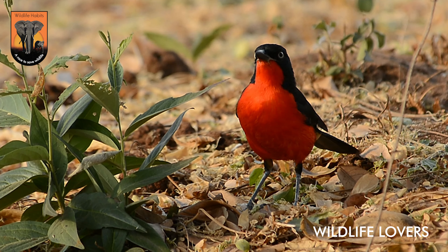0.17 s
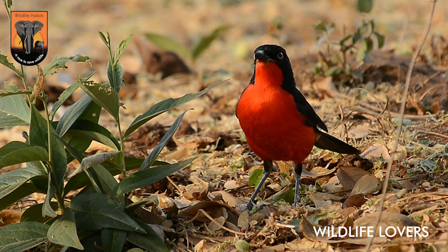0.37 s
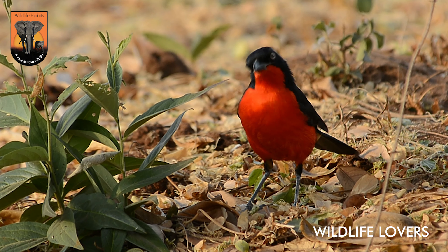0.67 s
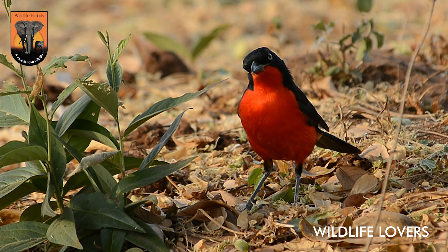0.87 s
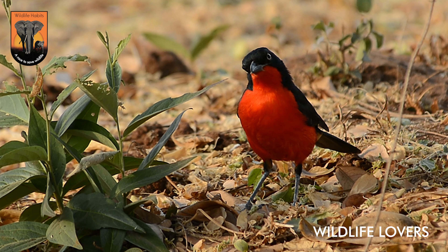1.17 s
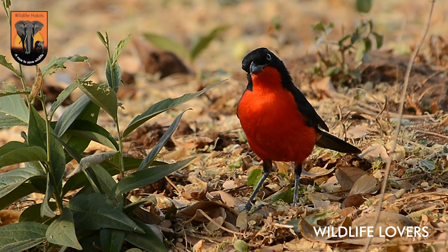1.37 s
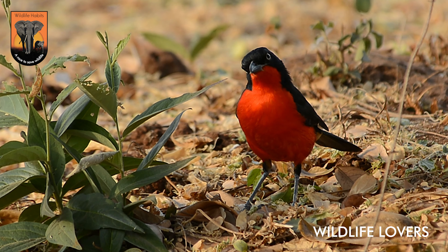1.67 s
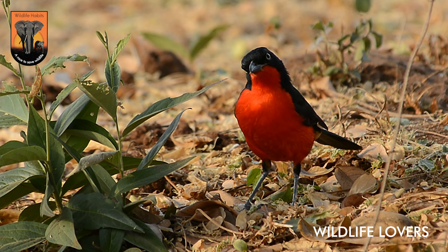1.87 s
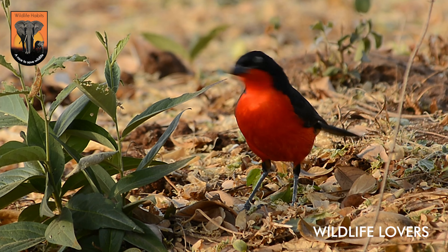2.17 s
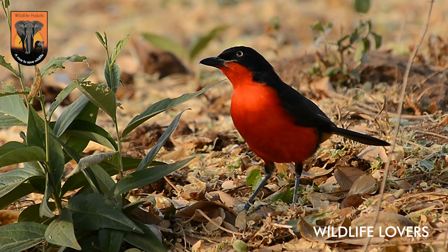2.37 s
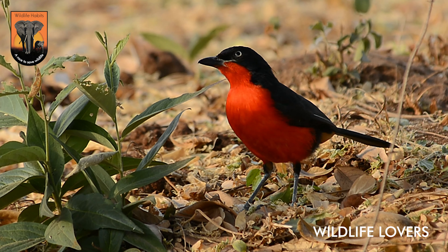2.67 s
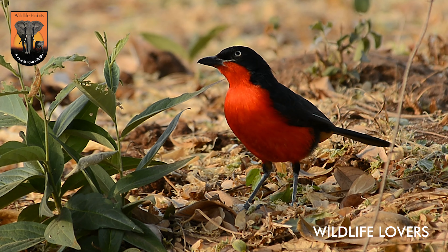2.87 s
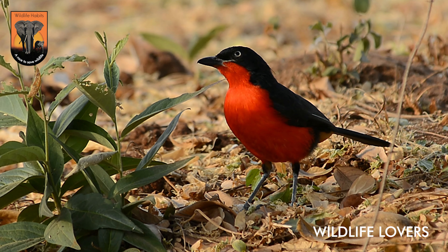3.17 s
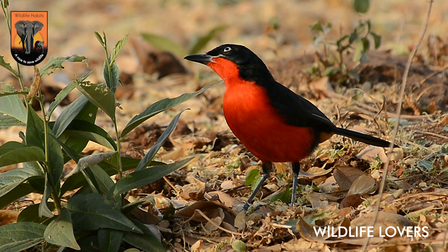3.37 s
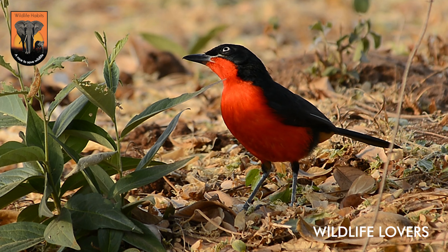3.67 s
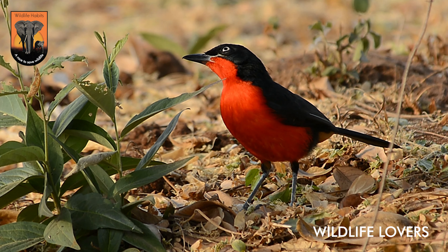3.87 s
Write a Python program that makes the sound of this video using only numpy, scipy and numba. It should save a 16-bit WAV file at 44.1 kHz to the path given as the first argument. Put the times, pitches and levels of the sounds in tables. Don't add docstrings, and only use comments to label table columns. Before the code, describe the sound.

Two bush birds duet close by in open woodland. At 0 s the tail of a whistle sounds with a harsh falling rasp, ending around 0.2 s with slight woodland echo. Quiet air, faint low hum and soft leaf gusts follow; distant birds warble at 1.1-1.8 s and sing at 1.9-2.3 s. Wavering whistles at 3.2 and 3.55 s each meet a rasp, ending near 3.85 s; faint chirps follow.

```python
import sys
import numpy as np
from scipy import signal
from scipy.fft import rfft, irfft
from scipy.io import wavfile
from scipy.ndimage import uniform_filter1d
from numba import njit

SR = 44100
rng = np.random.default_rng(int(sys.argv[2]) if len(sys.argv) > 2 else 0)


def level_to_linear(level):
    exponent = np.asarray(level, float) / 20
    return 10 ** exponent


def generate_wav(signal):
    frames = np.transpose(np.atleast_2d(signal))
    scaled = np.clip(frames, -1, 1) * 32767
    pcm = np.round(scaled).astype(np.int16)
    wavfile.write(sys.argv[1], SR, pcm)


N = 176400
T = np.arange(N) / SR

# (time [s], pitch [Hz], level [dB])
OPENING_WHISTLE = [(0, 1523, -26), (.008, 1783, -24.5), (.02, 1756, -22.5), (.036, 1512, -25.5),
                   (.044, 1460, -30.5), (.052, 1500, -57)]
SECOND_WHISTLE = [(3.176, 1155, -56), (3.189, 976, -32), (3.202, 1005, -31.5), (3.224, 1674, -23),
                  (3.233, 1653, -24.5), (3.26, 1269, -25), (3.284, 1810, -25), (3.299, 1857, -23.5),
                  (3.319, 1562, -25.5)]
THIRD_WHISTLE = [(3.545, 1101, -53), (3.558, 989, -30.5), (3.574, 991, -31.5), (3.592, 1597, -27.5),
                 (3.599, 1553, -23), (3.631, 1175, -26.5), (3.656, 1744, -23), (3.667, 1697, -21.5),
                 (3.685, 1496, -28)]
# (time [s], depth [0-1], width [s])
VOICE_BREAKS = [(3.2199, 0.6, 0.00092), (3.2456, .95, 0.0018), (3.262, 0.63, 0.0054), (3.271, 0.6, 0.002),
                (3.284, 0, .002), (3.5864, 1, 0.0015), (3.605, 0.8, .003), (3.617, 0.83, 0.0024),
                (3.641, 0.57, 0.0025), (3.647, 0.4, 0.0018)]
# (time [s], width [s], level [dB])
OVERTONE_FLARES = [
    (3.227, .011, 9),
    (3.617, .014, 14),
    (3.66, .011, 11),
]
# (centre [Hz], width [Hz], level [dB])
BEAK = [(6800, 1800, 0), (10000, 600, -5), (11500, 900, -6), (13300, 1800, -4)]
# (centre [Hz], width [Hz], level [dB])
FIRST_NOTE_TAIL = (1170, 360, -45.5)
# (start [s], hold [s], level [dB])
RASPS = [
    (-.03, 0.21, -37.5),
    (3.258, 0.22, -37.5),
    (3.639, 0.2, -38.5),
]
# (start [Hz], end [Hz], width [Hz], level [dB], swell [dB/s])
THROAT = [(1750, 1580, 680, -4, -2.5), (2670, 1760, 250, -4, 16.5), (2560, 2200, 800, -1.5, -17.5),
          (4190, 3100, 1200, -10.5, -24), (6140, 4700, 2600, -17.5, -33), (9520, 7400, 600, -13.5, -30),
          (8460, 7600, 1400, -9.5, -12), (9020, 8400, 2300, -10.5, -30), (11800, 11400, 900, -27, -10),
          (13300, 15600, 2600, -20, -8), (14900, 13000, 2000, -20, 5), (2890, 2850, 410, -11.5, -60)]
# (delay [s], length [s], start [Hz], end [Hz], width [Hz], level [dB])
BEAK_CLOSING = (.145, .085, 12400, 10900, 1600, -23)
# (time [s], length [s], start [Hz], end [Hz], level [dB])
WARBLE = [(1.06, .02, 2950, 2600, -57), (1.085, .012, 2850, 3150, -62), (1.092, .02, 2750, 2550, -60),
          (1.104, .02, 3200, 3250, -61), (1.136, .016, 2250, 2500, -59), (1.162, .018, 2750, 3150, -54),
          (1.181, .013, 2900, 3100, -57), (1.327, .02, 3150, 2750, -56), (1.348, .012, 2600, 2450, -60),
          (1.35, .02, 2850, 3100, -58), (1.376, .016, 3000, 3200, -61), (1.425, .018, 2200, 2700, -63),
          (1.441, .02, 2800, 3250, -53), (1.456, .014, 2650, 2450, -61), (1.618, .024, 3150, 2700, -54),
          (1.643, .016, 3050, 3080, -58), (1.678, .016, 2900, 2800, -60), (1.716, .018, 2500, 2550, -59),
          (1.729, .018, 2750, 3050, -57), (1.79, .03, 3100, 2850, -64), (1.676, .014, 3200, 3600, -62),
          (1.668, .016, 4000, 4150, -64), (1.695, .02, 2100, 2400, -63), (1.385, .016, 3200, 3550, -63),
          (1.114, .012, 3150, 2900, -62)]
# (time [s], length [s], start [Hz], end [Hz], level [dB])
SONG = [(1.905, .035, 2800, 2420, -61), (1.938, .016, 2500, 4500, -56), (1.953, .022, 4750, 4800, -56),
        (1.975, .022, 4780, 4760, -59), (1.966, .016, 4150, 4200, -60), (1.964, .016, 2950, 3050, -60),
        (2.089, .022, 4350, 3250, -54), (2.108, .037, 3250, 2600, -52), (2.142, .018, 2620, 3050, -53),
        (2.158, .012, 3000, 2750, -55), (2.252, .02, 5900, 4700, -56), (2.27, .03, 4750, 4600, -58),
        (1.945, .028, 2550, 2400, -61), (2.012, .018, 4850, 4650, -61), (1.944, .012, 3900, 4300, -58)]
# (time [s], length [s], start [Hz], end [Hz], level [dB])
CHIRPS = [(.7, .1, 1650, 1630, -65), (.885, .03, 4100, 4000, -68), (2.765, .015, 2350, 2350, -65),
          (2.807, .016, 2150, 2140, -47), (3.01, .075, 1350, 1000, -60), (3.128, .028, 1600, 1950, -58),
          (3.918, .024, 2530, 2380, -44), (3.97, .013, 2130, 2100, -46)]
# (time [s], length [s], start [Hz], end [Hz], level [dB])
BUZZES = [(1.952, .045, 4300, 4200, -64), (2.258, .09, 4900, 4400, -55.5), (2.245, .09, 3800, 3450, -62),
          (1.065, .15, 2750, 2650, -61), (1.335, .15, 2800, 2700, -61), (1.625, .15, 2800, 2600, -61)]
# (time [s], length [s], start [Hz], end [Hz], level [dB])
STROKES = [
    (.62, .19, 1620, 1620, -68),
    (1.35, .5, 1660, 1660, -73),
    (2.3, .6, 1680, 1660, -73),
]
# (peak time [s], rise [s], fall [s], level [dB])
GUSTS = [
    (0.449, 0.19, 0.091, -54.5),
    (1.2, .1, 0.15, -56.5),
    (2.05, 0.1, 0.19, -55),
    (4.02, 0.083, .1, -56),
]
# (frequency [Hz], level per Hz [dB])
LEAF_COLOUR = [(1500, 1), (3000, -1), (5200, 1), (8000, -2), (12000, -8), (16500, -9)]
# (frequency [Hz], level [dB])
ENGINE_TONES = [
    (35.5, -78.5),
    (71, -72),
    (106, -76.5),
]
# (frequency [Hz], level per Hz [dB])
LOW_AIR = [(36, -44), (62, -11.5), (201, -7), (332, -12.5), (359, -4), (398, -13), (503, -1), (595, -6),
           (900, -19), (1170, -85), (1980, -120)]
# (frequency [Hz], level per Hz [dB])
HIGH_AIR = [(530, -7), (900, -2.5), (1470, -3), (1650, -4.5), (2050, -8.5), (2420, -7), (2750, -10),
            (16500, -22.5)]
# (frequency [Hz], side level [dB])
STEREO_WIDTH = [(60, -39), (250, -11.5), (500, -13.5), (1000, -9), (3000, -5), (8000, -0.5), (14000, 4)]


@njit
def svf(x, hz, width):
    y, b, l = np.empty(len(x)), 0., 0.
    for i in range(len(x)):
        g, k = np.tan(np.pi * hz[i] / SR), width / hz[i]
        v = (b + g * (x[i] - l)) / (1 + g * (g + k))
        b, l, y[i] = 2 * v - b, l + 2 * g * v, k * v
    return y


def resonance(x, hz, width):
    centre = np.zeros(len(x)) + hz
    return svf(svf(x, centre, 1. * width), centre, 1. * width)


def unit(x):
    return x / np.sqrt(np.mean(x ** 2))


def walk(rate):
    k = int(SR / rate)
    return unit(uniform_filter1d(uniform_filter1d(rng.standard_normal(N), k), k))


def wood(x, wet_db):
    t60_s, gap_s, top_hz = .6, .006, 3900
    echo_s, echo_db = .024, -21
    t = np.arange(SR) / SR
    tail = rng.standard_normal((3, SR)) * level_to_linear(-60 * t / t60_s) * (t > gap_s)
    tail = signal.lfilter(*signal.butter(1, top_hz, fs=SR), tail)
    tail = (tail[0] + .33 * tail[1:]) / np.sqrt(np.sum(tail[0] ** 2))
    echo = level_to_linear(echo_db) * np.interp(T - echo_s, T, x, left=0)
    return x + echo + level_to_linear(wet_db) * signal.fftconvolve(x[None], tail, axes=1)[:, :N]


def whistle():
    glide_s, flutter_db, release_db_s = 0.0071, 0.9, 1493
    overtone_db, breath_db, opens_hz = -46, -43, 1120
    gate = np.ones(N)
    for s, depth, width in VOICE_BREAKS:
        gate *= 1 - np.clip(depth, 0, 1) * np.exp(-((T - s) / width) ** 2)
    flare_db = sum(db * np.exp(-((T - s) / width) ** 4) for s, width, db in OVERTONE_FLARES)

    tone, upper = np.zeros(N), np.zeros(N)
    for call in (OPENING_WHISTLE, SECOND_WHISTLE, THIRD_WHISTLE):
        s, hz, db = np.array(call, float).T
        pitch = uniform_filter1d(np.interp(T, s, hz), int(glide_s * SR), mode="nearest")
        phase = 2 * np.pi * np.cumsum(pitch) / SR
        level_db = np.interp(T, s, db) - release_db_s * np.maximum(T - s[-1], 0)
        size = level_to_linear(level_db) * (T >= s[0])
        size = np.sqrt(2) * uniform_filter1d(size, 90, mode="nearest")
        tone += size * np.sin(phase)

        opening = np.clip((pitch - opens_hz) / 60, 0, 1) * (T > s[1])
        overtones = np.zeros(N)
        for m in range(4, 10):
            overtones += level_to_linear(overtone_db + flare_db + 3 * walk(60)) * np.sin(m * phase)
        breath = level_to_linear(breath_db) * 4 * rng.standard_normal(N)
        upper += size * opening * (overtones + breath)

    beak = sum(level_to_linear(db) * resonance(upper, hz, width) for hz, width, db in BEAK)
    return tone * gate * level_to_linear(flutter_db * walk(150)) + beak


def first_note_tail():
    hz, width, db = FIRST_NOTE_TAIL
    t60_s = .6
    ring = resonance(rng.standard_normal(N), hz, width)
    return level_to_linear(db - 60 * T / t60_s) * unit(ring)


def rasp():
    attack_s, fade_db_s, release_db_s = 0.006, 3, 320
    grain_db, patchy_db, wander_share, sweep_s = 1.5, 1.3, .012, 0.2387
    treble_early_s = 0.022
    out = np.zeros(N)
    patches, wander = walk(45), walk(35)
    for s, hold, db in RASPS:
        a, b = max(int(s * SR), 0), min(int((s + .55) * SR), N)
        t = T[a:b] - s
        grain = level_to_linear(grain_db * walk(74)[a:b])
        sink = np.clip(t / sweep_s, 0, 1.2) ** 0.984

        def ring(hz, width):
            return unit(resonance(rng.standard_normal(b - a) * grain, hz, 1.18 * width))

        for f0, f1, width, gain_db, swell_db in THROAT:
            at = rng.integers(N - len(t))
            part = slice(at, at + len(t))
            hz = (f0 + (f1 - f0) * sink) * (1 + wander_share * wander[part])
            hz = np.minimum(hz, 19000.)
            early = treble_early_s * np.log2(f1 / THROAT[0][0])
            late = np.maximum(t - hold + early, 0)
            level_db = db + (swell_db - fade_db_s) * t - release_db_s * late
            size = np.clip(t / attack_s, 0, 1) * level_to_linear(level_db)
            out[a:b] += level_to_linear(gain_db - 2.5 + patchy_db * patches[part]) * size * ring(hz, width)

        after, length, f0, f1, width, gain_db = BEAK_CLOSING
        u = np.clip((t - after) / length, 0, 1)
        size = level_to_linear(db + gain_db) * np.sqrt(np.abs(np.sin(np.pi * u)))
        out[a:b] += size * ring(f1 + (f0 - f1) * (1 - u) ** 2, width)
    return out


def rasp_scatter():
    side_db, side_hz = -10, 3550
    treble = signal.lfilter(*signal.butter(2, side_hz, "high", fs=SR), rasp())
    return level_to_linear(side_db) * treble * np.array([[1], [-1]])


def far_birds(notes, blur_hz, clear):
    out = np.zeros(N)
    scatter = walk(blur_hz) + 1j * walk(blur_hz)
    scatter = np.sqrt(clear) + np.sqrt((1 - clear) / 2) * scatter
    for s, length, from_hz, to_hz, db in notes:
        a, u = int(s * SR), np.arange(int(length * SR)) / (length * SR)
        hz = to_hz + (from_hz - to_hz) * (1 - u) ** 1.254
        tone = (scatter[a:a + len(u)] * np.exp(2j * np.pi * np.cumsum(hz) / SR)).imag
        out[a:a + len(u)] += np.sqrt(2) * level_to_linear(db) * np.sin(np.pi * u) ** .4 * tone
    return out


def on_log(points, hz):
    p = np.array(points, float)
    return level_to_linear(np.interp(np.log(hz), np.log(p[:, 0]), p[:, 1], left=-80, right=-80))


def air(points, flicker_db, wide_db=0):
    f = np.maximum(np.fft.rfftfreq(N, 1 / SR), 1)
    width = [(20, STEREO_WIDTH[0][1])] + STEREO_WIDTH + [(20000, STEREO_WIDTH[-1][1])]
    wide = level_to_linear(wide_db) * on_log(width, f)
    spec = rfft(rng.standard_normal((2, N))) * on_log(points, f) * np.array([np.ones_like(f), wide])
    band = np.log2(f / 30) * 2
    out = np.zeros((2, N))
    for k in range(19):
        near_hz = 30 * 2 ** (k / 2) * np.array([.75, 1, 1.4])
        if np.any(on_log(points, near_hz) > 1e-3):
            share = np.clip(1 - abs(band - k), 0, 1)
            out += irfft(spec * share, N) * level_to_linear(flicker_db * walk(5.5))
    mid, side = out / np.sqrt(np.mean(out[0] ** 2))
    return np.array([mid + side, mid - side])


def leaves():
    swell = np.zeros(N)
    for s, rise, fall, db in GUSTS:
        spread = np.where(T < s, rise, fall)
        swell += level_to_linear(db) * np.exp(-((T - s) / spread) ** 2 / 2)
    return swell * air(LEAF_COLOUR, 1.0, wide_db=-3.5)


def engine():
    out = np.zeros(N)
    for k, (hz, db) in enumerate(ENGINE_TONES):
        size = np.sqrt(2) * level_to_linear(db + 0.79 * k * walk(12))
        unsteady_time = T + 0.0012 * walk(0.35)
        out += size * np.sin(2 * np.pi * hz * unsteady_time + k)
    return out


def still_air():
    low_db, high_db = -60.5, -58.5
    return level_to_linear(low_db) * air(LOW_AIR, 0.85) + level_to_linear(high_db) * air(HIGH_AIR, 1.0)


def scene():
    left_db = -1.1
    near = wood(whistle(), wet_db=-18) + first_note_tail()
    near = near + wood(rasp(), wet_db=-13) + rasp_scatter()
    hoarse = far_birds(STROKES, blur_hz=180, clear=.65) + far_birds(BUZZES, blur_hz=800, clear=.05)
    far = wood(far_birds(WARBLE + SONG, blur_hz=150, clear=.9), wet_db=-13)
    far = far + wood(far_birds(CHIRPS, blur_hz=80, clear=.92), wet_db=-12) + wood(hoarse, wet_db=-9)
    mix = near + far + leaves() + engine() + still_air()
    return mix * level_to_linear(np.array([[left_db], [-left_db]]) / 2)


def roll_off(x):
    return signal.sosfilt(signal.butter(12, 15720, fs=SR, output="sos"), x)


def record(dry):
    return roll_off(dry)


dry = scene()
out = record(dry)
generate_wav(out)
```